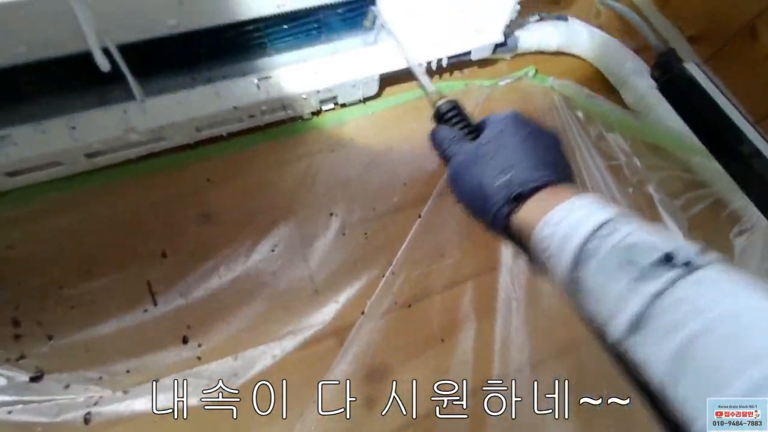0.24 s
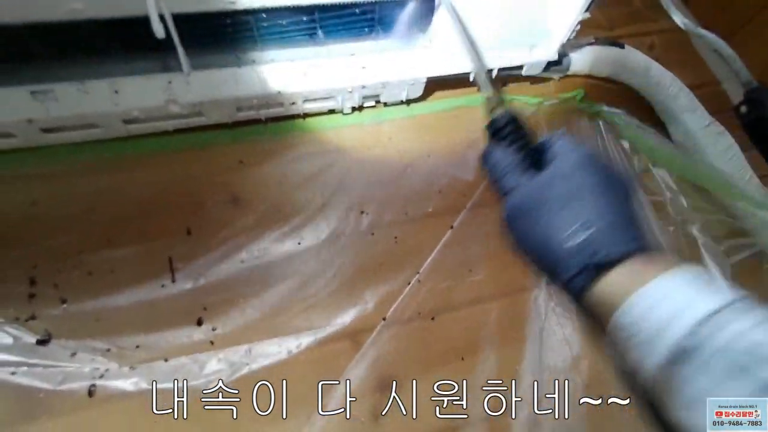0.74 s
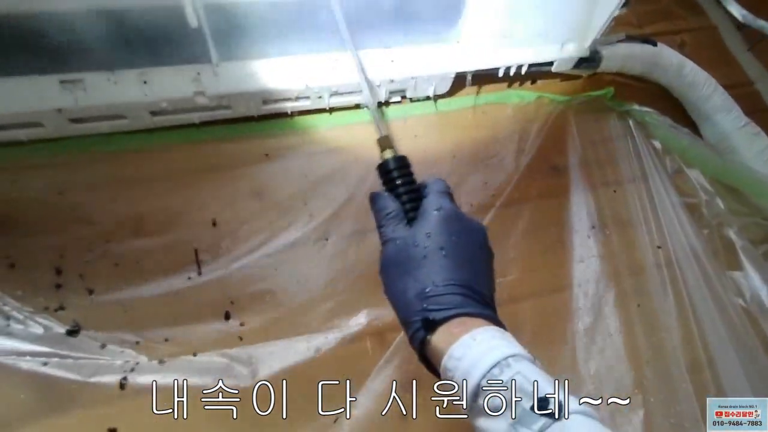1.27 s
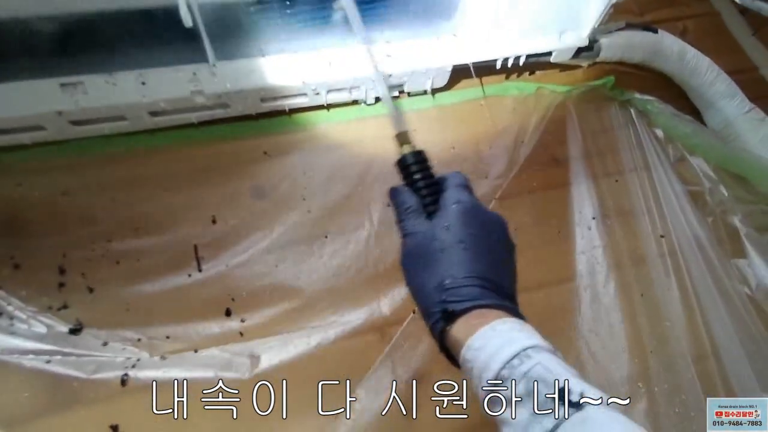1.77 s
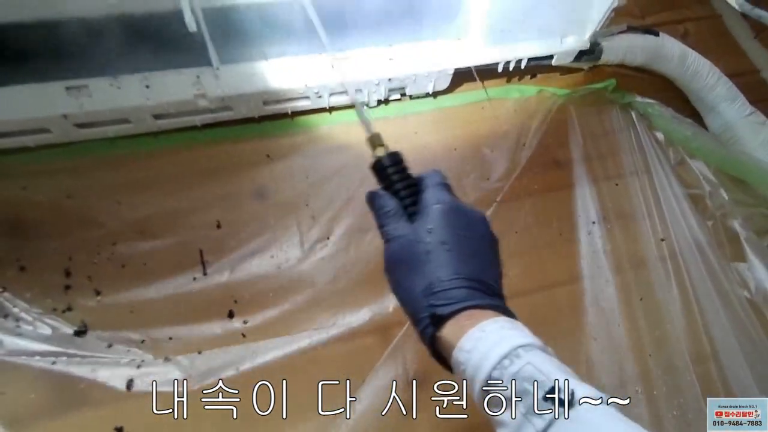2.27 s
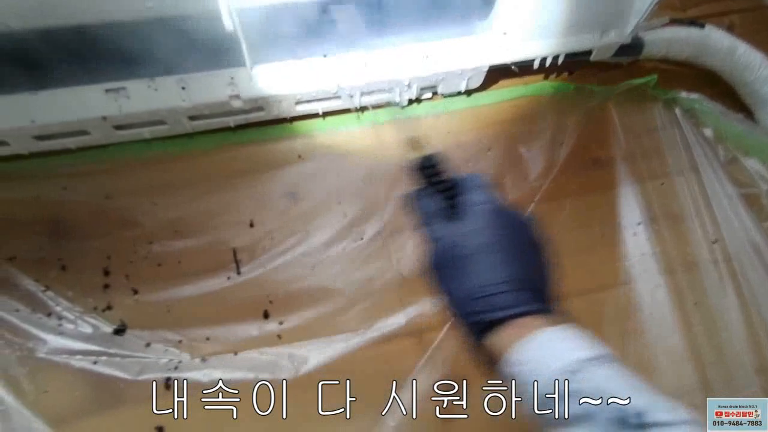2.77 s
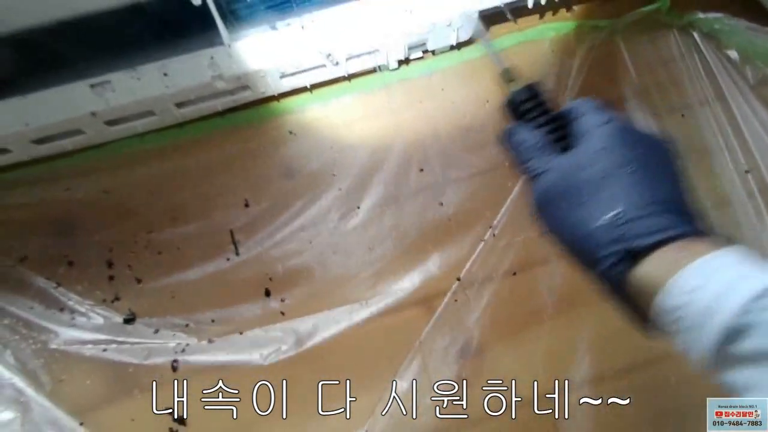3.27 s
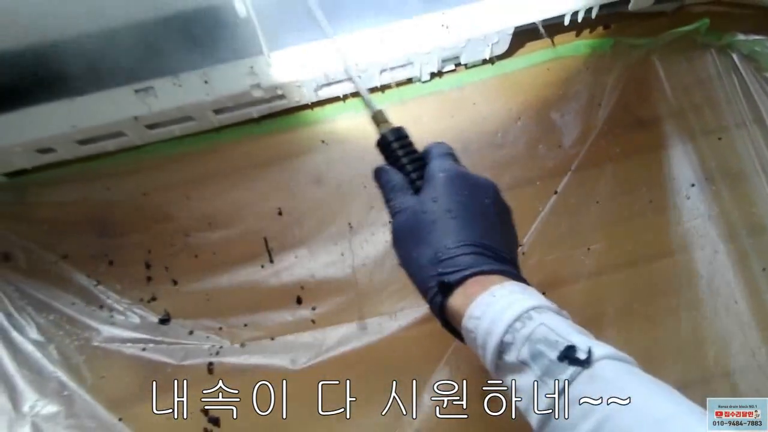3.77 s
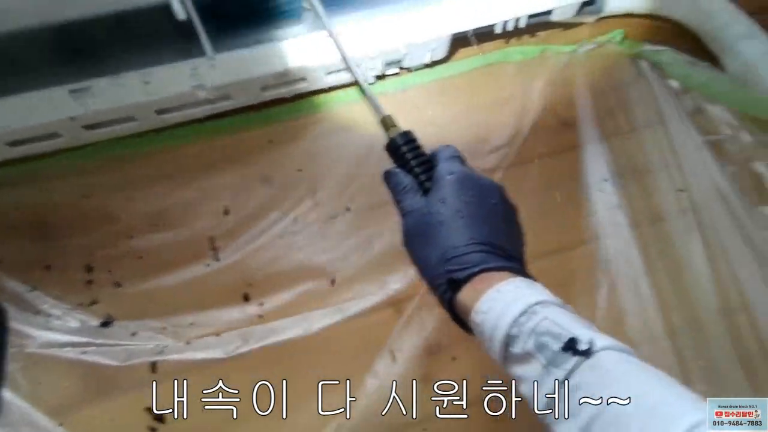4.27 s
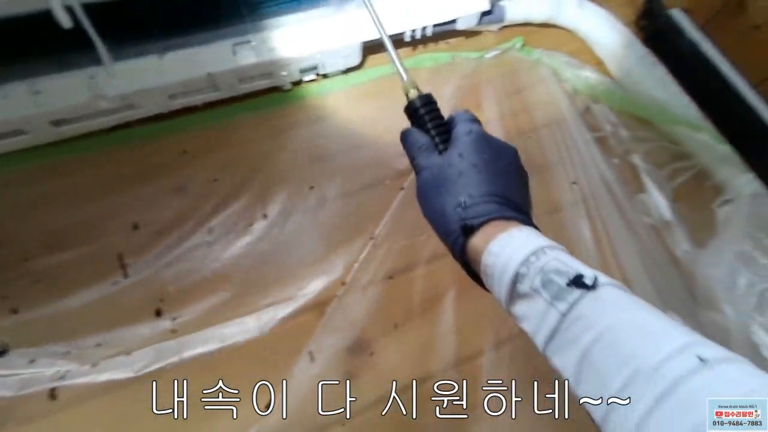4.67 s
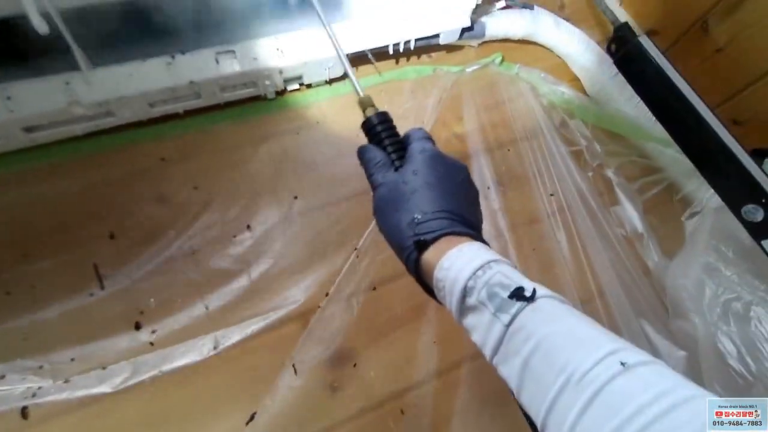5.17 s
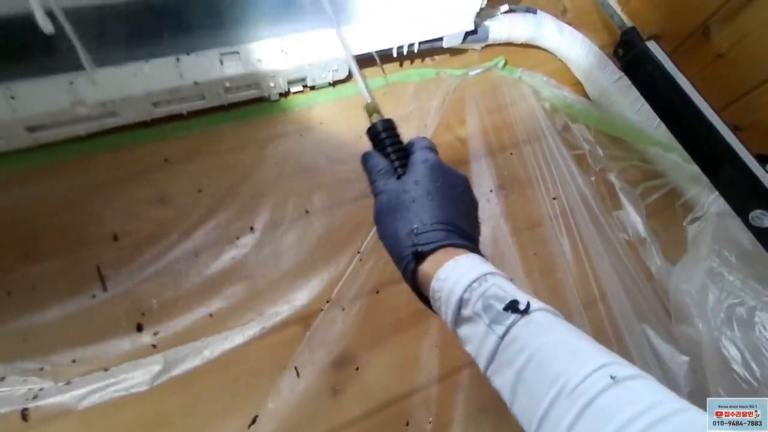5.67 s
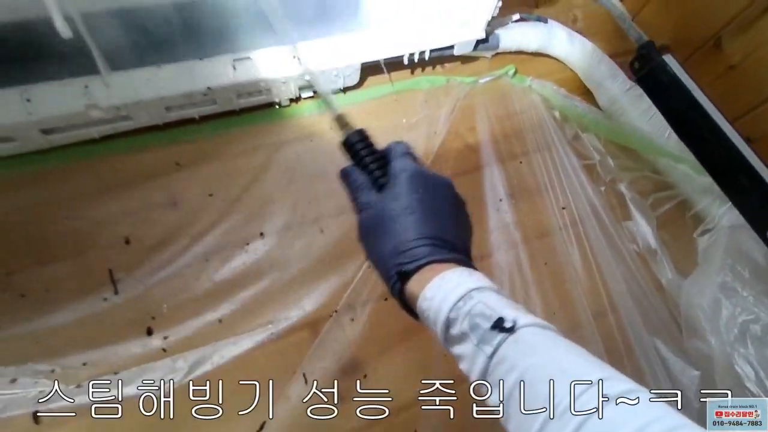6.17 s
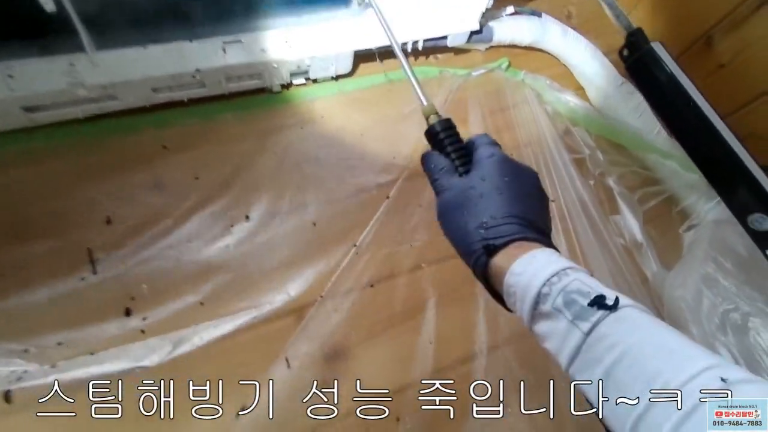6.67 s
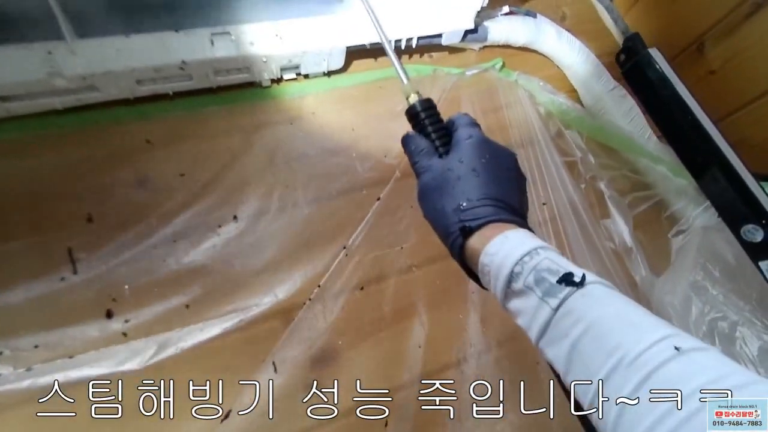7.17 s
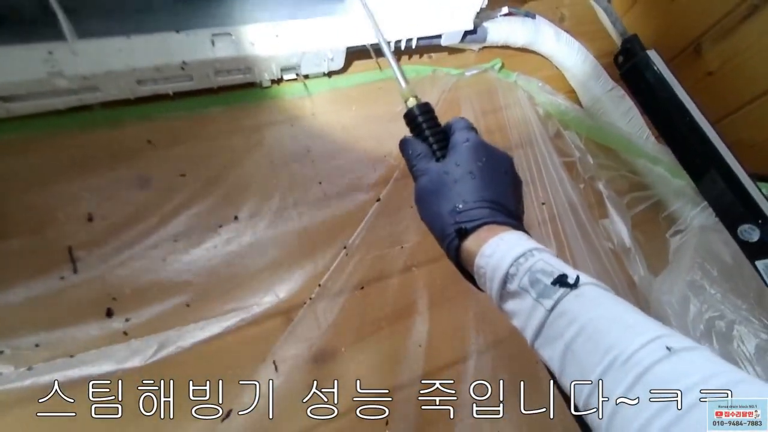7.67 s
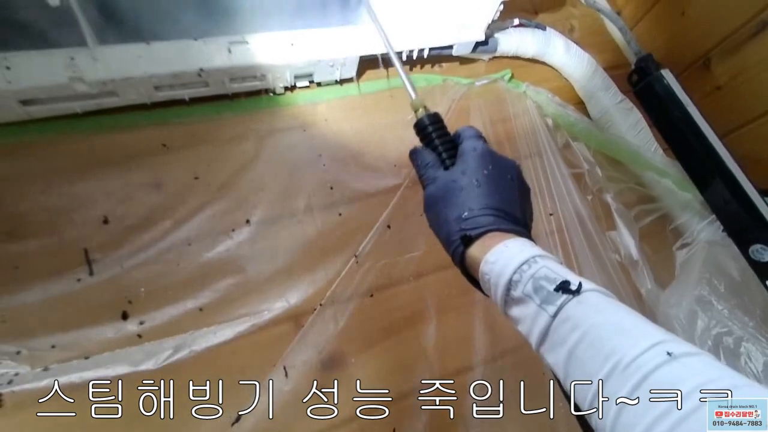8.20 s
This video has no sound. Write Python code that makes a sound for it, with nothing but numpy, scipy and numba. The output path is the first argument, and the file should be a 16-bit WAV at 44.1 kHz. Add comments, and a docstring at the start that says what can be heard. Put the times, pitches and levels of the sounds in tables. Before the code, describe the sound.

Continuous pressurised steam hisses at close range, dominated by treble and flickering quickly. Its tone shifts subtly as the nozzle moves, with short metallic, comb-like reflections from nearby surfaces. Water spatters faintly, while dry clicks and tiny bursts of noise crackle over it, sparse at first and then frequent. A low machine hum and rumble are barely audible. Small room, close, slightly clipping microphone.

```python
"""Steam lance on the fins of an air conditioner

A steam lance is swept over the fins of a wall air conditioner in a small room. The nozzle hisses and the jet
roars on the fins: flickering bands of coloured noise with short echoes from nearby faces and walls. The hollow
housing roars as resonant noise, condensed water spatters as fluctuating noise, short bursts and clicks sound as
of an overloaded microphone, and the machine hums as sines on the mains above a low noise rumble."""
import sys
import numpy as np
from scipy import signal
from scipy.fft import rfft, irfft
from scipy.io import wavfile
from scipy.ndimage import uniform_filter1d, map_coordinates
from numba import njit

SR = 44100
rng = np.random.default_rng(int(sys.argv[2]) if len(sys.argv) > 2 else 0)


def unload_wav(signal):
    """Save mono or channel-first audio to the path in sys.argv[1] as 16-bit WAV at rate SR, clipped to [-1, 1]."""
    wavfile.write(
        sys.argv[1],
        SR,
        np.round(np.clip(np.atleast_2d(signal).T, -1, 1) * 32767).astype(np.int16),
    )


N = 372204

# Hum of the machine. Each row: multiple of the mains frequency, rms level in dB before wavering.
HUM = [(1, -60.5), (2, -52), (3, -44), (6, -59)]
MAINS_HZ = 59.97
# Colour of the low rumble. Each row: frequency in Hz, relative level per Hz in dB.
RUMBLE = [(20, -18), (60, -17), (140, 0.5), (200, 2), (260, -39), (600, -34)]
RUMBLE_DB = -48  # rms

# Colour of spatter and bursts. Each row: frequency in Hz, relative level per Hz in dB.
SPATTER = [(25, -3), (150, -3.5), (250, -7.5), (330, 0), (450, 2.5), (750, 2), (950, 1.5), (1150, 0),
           (1400, -4.5), (2000, -4), (4500, -5), (8000, -4.5), (12000, -19.5)]
# Left-right correlation of spatter, bursts and rumble. Each row: frequency in Hz, correlation (0-1).
SPATTER_LIKENESS = [(60, 0.77), (200, 0.65), (640, 0.3), (2000, 0.67), (8000, 0.18)]
# Short broadband noise bursts, as of an overloaded microphone.
# Each row: start in seconds, level of the high part in dB, level of the low part in dB.
BURSTS = [(.489, -34, -43), (.552, -21, -24), (0.629, -11, -16), (.656, -22, -32), (1.277, -17, -25),
          (2.918, -24, -27), (2.925, -16.5, -25), (2.933, -18, -27), (2.98, -30, -22), (2.999, -22, -30),
          (3.014, -14.5, -32), (3.052, -18, -31), (3.075, -29, -31), (3.125, -14, -35), (3.1627, -16, -26),
          (3.206, -18, -36), (3.216, -16, -34), (3.237, -17, -21), (3.34, -20, -24), (3.357, -13, -32),
          (3.382, -18, -22), (3.388, -15.5, -24), (3.52, -19, -42), (3.789, -25, -19), (3.809, -13.5, -20),
          (3.838, -16, -34), (4.253, -18, -28), (4.435, -23, -35), (4.548, -16, -31), (4.573, -13.5, -27),
          (4.687, -21, -33), (5.001, -15, -24), (5.008, -18, -28), (5.019, -23, -28), (5.105, -18, -24),
          (5.266, -20, -33), (5.273, -20, -28), (5.287, -19, -27), (5.297, -11.5, -30), (5.303, -21, -30),
          (5.619, -15, -26), (5.625, -13, -29), (5.631, -19, -30), (5.637, -26, -31), (6.181, -14.5, -24),
          (6.27, -12, -35), (6.552, -12, -32), (6.661, -21, -26), (6.668, -14, -15), (6.675, -19, -25),
          (6.682, -24, -29), (6.855, -15, -30), (6.988, -19, -36), (7.013, -13, -31), (7.0185, -15, -32),
          (7.029, -17, -28), (7.302, -28, -18), (7.316, -24, -30), (7.325, -15, -26), (7.331, -21, -31),
          (7.446, -13, -25), (7.496, -12, -29), (7.638, -16, -26), (7.652, -13, -30), (7.658, -17, -23),
          (7.681, -15, -28), (7.687, -16, -29), (7.693, -22, -27), (7.737, -27, -24), (7.746, -27, -27),
          (7.757, -20, -28), (7.792, -17, -25), (7.924, -19, -26), (7.935, -19, -21), (7.976, -32, -38),
          (8.197, -18, -21), (8.293, -19, -22), (8.402, -17, -24)]
BURST_S, BURST_PAN_DB = 0.0087, 2.5  # length; spread of the left-right level difference
BURST_SPLIT_HZ = 1140  # between low and high part
SPATTER_SWELL_DB = 5  # rise of the spatter at full burst activity
BEFORE_S, AFTER_S = 0.033, 0.09  # the activity rises just ahead of a burst and falls after it

# The loudest sharp clicks, as of overload. Each row: time in seconds, click size in dB before panning.
LOUD_CLICKS = [(0.398, -12), (0.492, -7), (0.629, -6), (1.137, -9), (2.584, -5), (3.016, -6), (3.207, -7),
               (3.358, -6), (3.383, -5), (3.809, -6), (4.536, -7), (4.573, -5), (6.668, -8), (7.182, -7),
               (7.444, 0), (7.498, -6), (7.531, -6), (7.684, -6), (8.403, -7)]
CLICKS_PER_S, ACTIVE_CLICKS_PER_S = 20, 120  # other clicks; how many more at full burst activity
CLICK_DB, CLICK_SPREAD_DB = -17, 2.5  # smallest of the other clicks; scale of their chance excess
CLICK_HZ, CLICK_LIKENESS = (500, 6500), 0.7  # band of the click; 1 would make both sides equal

# The sweep. Each row: time in seconds, then base levels in dB of the nozzle hiss, the roar on the fins,
# the housing roar and the spatter.
SWEEP = [(0, -12.5, -22, -33.5, -37.5), (.2, -12.5, -23.5, -30, -32), (.45, -13, -20, -25, -32),
         (.52, -12.5, -22, -29, -38), (.6, -11.5, -21.5, -31.5, -30.5), (.72, -10.5, -22.5, -29, -41),
         (.8, -8.5, -20.5, -29, -35), (.95, -9.5, -21, -29, -28), (1.3, -9.5, -23, -31, -43),
         (1.55, -11, -24, -28.5, -35), (1.78, -10.5, -23, -29.5, -34), (1.84, -10.5, -22.5, -28.5, -27.5),
         (1.92, -10, -21.5, -27, -28), (2.05, -11, -23.5, -32, -37), (2.2, -10.5, -21.5, -28.5, -35.5),
         (2.4, -12.5, -22.5, -30, -37), (2.58, -9, -22.5, -28, -41), (2.75, -12.5, -24.5, -29, -33),
         (2.86, -12, -21.5, -29, -47), (2.93, -10, -25.5, -34, -34), (3.1, -12, -21.5, -26.5, -37),
         (3.4, -11, -22.5, -31, -35.5), (3.55, -11, -21.5, -30.5, -38.5), (3.95, -9, -24.5, -28.5, -38.5),
         (4.2, -12, -20.5, -31, -38), (4.31, -11, -20.5, -35, -37), (4.4, -11, -23, -36, -35),
         (4.55, -11, -23.5, -30, -43), (4.68, -13, -23, -32, -36), (4.78, -11.5, -21, -30, -32.5),
         (5.1, -11, -20, -31.5, -36), (5.3, -11, -21.5, -30, -41.5), (5.7, -11, -21.5, -30, -35.5),
         (6.1, -11.5, -20, -31, -34), (6.3, -10, -21.5, -34.5, -36.5), (6.55, -12.5, -18.5, -31, -35),
         (6.64, -10, -23, -29, -38), (6.75, -11.5, -21, -29.5, -35.5), (6.93, -11, -20.5, -29.5, -31),
         (7.03, -10.5, -20, -28, -33.5), (7.4, -10.5, -20, -29.5, -36), (7.85, -9, -20.5, -28, -32.5),
         (8.1, -9, -24, -27, -35), (8.27, -8.5, -20.5, -26.5, -31), (8.44, -13, -26, -29, -30)]

# Pitch of the hollow behind the fins, set by where the jet enters. Each row: time in seconds, mean pitch in Hz.
HOLLOW_HZ = [(0, 1500), (.25, 1550), (.45, 1900), (.7, 1510), (1.4, 1450), (2.6, 1580), (3.1, 1510),
             (3.6, 1560), (3.95, 1800), (4.2, 1600), (4.6, 1660), (5.0, 1870), (5.8, 1870), (6.4, 1740),
             (6.8, 1900), (7.2, 1960), (8.44, 1840)]
HOUSING_WIDTH_HZ = 850  # bandwidth of each of two passes
HOUSING_WANDER_HZ, HOUSING_FLOOR_HZ = 91, 1130  # chance spread of the pitch; high-pass corner

# Colours of the roar on the fins and of the hiss. Each row: frequency in Hz, relative level per Hz in dB.
FINS = [(900, -21), (1200, -7.5), (1400, 2), (2000, -14), (2500, 4), (3000, -1.5), (3600, 0.5), (5000, 0),
        (7000, 0), (9000, -1), (12000, -18.5)]
NOZZLE = [(4000, -15), (7000, -7), (9000, -2.5), (10500, 2), (12500, 1.5), (14000, 3.2), (14800, 4.6),
          (15600, 4.6), (16500, 4.6)]
# Left-right correlation of hiss and fin roar. Each row: frequency in Hz, correlation (0-1).
JET_LIKENESS = [(1000, 0.61), (3000, 1), (6000, 1), (10000, 0.78), (15000, 0.79)]
# Phase turn of the left channel: the ports differ in the treble. Each row: frequency in Hz, phase in radians.
LEFT_PHASE = [(5000, -.03), (7500, -0.1), (10000, -0.36), (12000, -.54), (15500, -0.83)]

# Echoes of the fin roar from the nearby face, the open slot (turned upside down), the edge just beside the
# jet, and deep in the housing. Each row: time in seconds, mean delay in ms, strength (0-1).
FACE_ECHO = [(0, .585, .4), (.3, .585, .4), (.55, .66, .25), (.75, .7, .05), (1.1, .65, .1), (1.5, .65, .2),
             (2.7, .64, .2), (3.1, .62, .05), (3.6, .63, .12), (3.9, .6, .1), (4.1, .58, .4),
             (4.4, .575, .4), (4.6, .56, .17), (4.9, .545, .2), (5.4, .55, .38), (6.5, .55, .4),
             (6.8, .56, .08), (7.15, .545, .4), (7.5, .54, .2), (7.8, .54, .3), (8.44, .535, .17)]
SLOT_ECHO = [(0, .68, .45), (.3, .685, .42), (.6, .75, .25), (.8, .78, .05), (1.1, .735, .2),
             (1.5, .735, .38), (2.2, .725, .42), (2.75, .73, .3), (3.0, .72, 0), (3.4, .73, 0),
             (3.65, .72, .25), (3.9, .7, .1), (4.15, .675, .3), (4.45, .665, .2), (4.8, .65, 0),
             (8.44, .65, 0)]
EDGE_ECHO = [(0, .25, 0), (.7, .25, .05), (1.0, .27, .22), (1.5, .295, .25), (2.3, .265, .22),
             (3.0, .26, .12), (3.4, .25, .08), (4.0, .25, 0), (8.44, .25, 0)]
DEEP_ECHO = [(0, 1.3, .25), (.22, 1.3, .28), (.27, 1.4, .05), (.32, 1.5, .24), (.5, 1.51, .2),
             (.6, 1.51, 0), (8.44, 1.51, 0)]
# Echoes of the hiss from the nearby face and a close edge.
# Each row: time in seconds, mean delay in ms, strength (0-1).
NOZZLE_FACE_ECHO = [(0, .6, .12), (.5, .7, .08), (1.5, .69, .12), (2.2, .68, .07), (2.6, .675, .18),
                    (2.9, .66, .04), (3.7, .64, .04), (4.0, .635, .1), (4.4, .6, .17), (4.7, .565, .08),
                    (5.1, .555, .18), (5.8, .55, .24), (6.1, .55, .17), (6.7, .565, .22), (7.0, .56, .15),
                    (7.2, .555, .27), (7.7, .553, .16), (8.44, .55, .19)]
NOZZLE_EDGE_ECHO = [(0, .28, .08), (.8, .28, .1), (1.1, .27, .03), (3.5, .275, .03), (3.75, .272, .17),
                    (4.45, .28, .15), (4.7, .29, .04), (8.44, .29, 0)]
TREMOR_MS = 0.012  # the hand is never still: spread of each echo's delay
# Paths inside the housing: delay range, spread of each path's gain, low-pass corner.
INNER_ECHO_MS, INNER_ECHO_STRENGTH, INNER_ECHO_CUT_HZ = (0.9, 5.0), 0.15, 12700
ROOM_ECHO_MS, ROOM_ECHO_STRENGTH = (6.0, 30.0), 0.15  # walls and sheeting nearby: delays, spread of gain

# Gain of the jet in its upper middle, which sinks as the lance swings aside.
# Each row: time in seconds, gain in dB.
SHADE = [(0, -1.5), (.15, -4), (.27, -4), (.35, -5), (.45, -6.5), (.58, -2), (.75, -3.5), (1.1, -2),
         (1.3, 1), (2.6, 0.5), (2.8, 0), (3.1, -1), (4.3, 0), (4.37, -3), (4.52, -4.5), (4.58, -2),
         (4.66, -1.5), (4.75, -0.5), (5.1, 0), (6.3, 0.2), (6.55, -1.5), (6.8, -4.5), (6.95, -3), (7.1, 0),
         (8.44, 1)]
SHADE_HZ = (3380, 8400)
DIP_HZ, DIP_DEPTH = (925, 1030), 0.6  # a narrow dip under the hiss; share taken out away from the bursts

# Width of the image between the bursts. Each row: time in seconds, share of opening (0-1).
WIDTH = [(0, 0.5), (.4, 0.5), (.7, 0.95), (1.3, 0.57), (1.45, 0.36), (2.75, 0), (2.9, 0.45), (3.45, .6),
         (3.55, 0), (3.7, 0.45), (4.0, 0.54), (4.6, 0.46), (5.35, 0.1), (5.45, 0), (5.6, 1), (6.0, 0.73),
         (6.45, 0.04), (6.6, 0.3), (7.15, 0.7), (7.4, 0.4), (8.44, 0.46)]
# Reach of the narrowing. Each row: frequency in Hz, share of the side sound that follows the width (0-1).
NARROWING = [(1100, 0.025), (1700, 1), (8000, 1), (10500, 0.08)]
WIDTH_EDGES_HZ = (0, 2500, 4000, 6000, 22050)  # bands that widen on their own
NARROW_DB, WIDE_DB, WIDTH_WANDER = -19, 2, 0.14  # side gain when closed and open; chance spread of opening

CUTOFF_HZ = 15760


def from_db(db):
    """Amplitude ratio: twenty decibels are a factor of ten."""
    return 10 ** (np.asarray(db) / 20)


def rms_one(x):
    """Normalisation of power: the root mean square becomes 1."""
    return x / np.sqrt(np.mean(x ** 2) + 1e-20)


def in_time(rows):
    """Linear interpolation of each column at every sample."""
    s, *columns = np.transpose(rows)
    return [np.interp(np.arange(N) / SR, s, c) for c in columns]


def at_hz(points, hz):
    """Interpolation along a logarithmic frequency axis."""
    known_hz, values = np.transpose(points)
    return np.interp(np.log(hz), np.log(known_hz), values)


def frequencies():
    """Frequencies of the Fourier bins in Hz, at least 1 so that a logarithm exists."""
    return np.maximum(np.arange(N // 2 + 1) * SR / N, 1)


def drift(rate_hz):
    """Slow random modulation: noise at every 40th sample through a double one-pole low-pass; spread 1."""
    r = np.exp(-80 * np.pi * rate_hz / SR)
    noise = rng.standard_normal(N // 40 + 2002)
    slow = signal.lfilter([1], [1, -2 * r, r * r], noise)[2000:]  # the filter has settled
    return np.interp(np.arange(N) / 40, np.arange(len(slow)), rms_one(slow))


def band_pass(x, band_hz):
    """Zero-phase filtering: a band is isolated without delay."""
    return signal.sosfiltfilt(signal.butter(2, band_hz, "band", fs=SR, output="sos"), x)


def turbulence(spectrum, likeness, flicker_db, count):
    """Turbulent noise: coloured and partly correlated in stereo, in bands that flicker separately; rms 1."""
    hz = frequencies()
    alike = np.clip(at_hz(likeness, hz), 0, 1)
    mid, side = rfft(rng.standard_normal((2, N))) * from_db(at_hz(spectrum, hz))
    pair = np.sqrt(1 + alike) * mid + np.sqrt(1 - alike) * side * [[1], [-1]]
    pair[0] *= np.exp(1j * at_hz(LEFT_PHASE, hz))
    low_hz, high_hz = spectrum[0][0], spectrum[-1][0]
    place = count * np.clip(np.log(hz / low_hz) / np.log(high_hz / low_hz), 0, 1)
    out = 0
    for k in range(count + 1):  # overlapping bands whose shares add up to one
        share = np.clip(1 - np.abs(place - k), 0, 1)
        out = out + from_db(flicker_db * drift(13.0)) * irfft(pair * share, N)
    return rms_one(out)


def path_lags(range_ms, count):
    """Multipath delays in samples: geometrically spaced and slightly scattered."""
    ms = np.geomspace(*range_ms, count) * rng.uniform(0.95, 1.05, count)
    return (ms * SR / 1000).astype(int)


def room(x, count=10):
    """Interference of reflections: nearby walls colour the noise finely as the paths slowly change."""
    out = x
    for lag in path_lags(ROOM_ECHO_MS, count):
        out = out + ROOM_ECHO_STRENGTH * drift(1.43) * np.roll(x, lag, axis=1)
    return out / np.sqrt(1 + count * ROOM_ECHO_STRENGTH ** 2)


def hum():
    """Harmonic excitation: pump and transformer sound on multiples of the mains, wavering a little."""
    turn = 2 * np.pi * MAINS_HZ * np.arange(N) / SR
    out = 0
    for multiple, db in HUM:
        amplitude = np.sqrt(2) * from_db(db + 2.2 * drift(6))
        out = out + amplitude * np.sin(multiple * turn + rng.uniform(0, 6))
    return out


def rumble():
    """Low-frequency noise: a steady flickering band under the other sounds."""
    return from_db(RUMBLE_DB) * turbulence(RUMBLE, SPATTER_LIKENESS, flicker_db=2.0, count=3)


def burst_activity():
    """Temporal density: a control (0-1) that rises and falls smoothly around every noise burst."""
    s = np.arange(0, N, 64) / SR
    near = 0
    for at, _, _ in BURSTS:
        near = near + np.exp(-((s - at) / np.where(s < at, BEFORE_S, AFTER_S)) ** 2)
    return np.interp(np.arange(N) / SR, s, np.tanh(near))


def spatter_and_bursts(spatter_db):
    """Amplitude-modulated noise: a fluctuating spatter, and short bursts as of an overloaded microphone."""
    small = from_db(1.9 * drift(145) + 1.0 * drift(22))
    low_level = from_db(spatter_db) * rms_one(small) * np.ones((2, 1))
    high_level = low_level.copy()
    size = max(int(BURST_S * SR), 20)
    for s, high_db, low_db in BURSTS:
        start = int(s * SR)
        pan = from_db(BURST_PAN_DB * rng.standard_normal() * np.array([[0.5], [-0.5]]))
        burst = pan * np.sqrt(np.hanning(size))[:N - start]
        high_level[:, start:start + size] += burst * from_db(high_db)
        low_level[:, start:start + size] += burst * from_db(low_db)
    noise = room(turbulence(SPATTER, SPATTER_LIKENESS, flicker_db=2.5, count=9))
    low = signal.filtfilt(*signal.butter(2, BURST_SPLIT_HZ, fs=SR), noise)
    return low_level * low + high_level * (noise - low)


def clicks(activity):
    """Impulse response: sharp band-limited clicks at chance times, mostly negative-going, as of overload."""
    born = rng.random(N) < (CLICKS_PER_S + ACTIVE_CLICKS_PER_S * activity) / SR
    sizes = born * from_db(CLICK_DB + CLICK_SPREAD_DB * np.minimum(rng.exponential(1, N), 3))
    s, db = np.transpose(LOUD_CLICKS)
    sizes[(s * SR).astype(int)] = from_db(db)
    sign = np.where(rng.random(N) < 0.75, -1, 1)
    side = (1 - CLICK_LIKENESS) * rng.standard_normal(N) * np.array([[1.], [-1.]])
    impulse = np.arange(64) == 0
    click = signal.lfilter(*signal.butter(1, CLICK_HZ, "band", fs=SR), impulse)
    return signal.lfilter(click / click.max(), [1], sign * sizes * (1 + side))


@njit
def moving_resonance(x, cosine, r):
    """Time-varying resonance: a two-pole band-pass whose centre changes sample by sample."""
    y = np.zeros_like(x)
    for i in range(2, x.shape[1]):
        for c in range(2):
            y[c, i] = x[c, i] - x[c, i - 2] + 2 * r * cosine[i] * y[c, i - 1] - r * r * y[c, i - 2]
    return y


def housing(hz):
    """Cavity resonance: noise in the hollow behind the fins takes a pitch set by where the jet enters."""
    x = rng.standard_normal(N) + 0.11 * rng.standard_normal(N) * np.array([[1.], [-1.]])
    cosine = np.cos(2 * np.pi * hz / SR)
    r = np.exp(-np.pi * HOUSING_WIDTH_HZ / SR)
    for _ in range(2):
        x = moving_resonance(x, cosine, r)
    x = signal.sosfilt(signal.butter(4, HOUSING_FLOOR_HZ, "high", fs=SR, output="sos"), x)
    half_second_power = uniform_filter1d(x[0] ** 2, size=22050)
    return rms_one(x / np.sqrt(half_second_power))


def hollow_roar(housing_db, surge_db):
    """Flow-excited cavity: the housing roars with a wandering pitch and a level that follows the surges."""
    hz = in_time(HOLLOW_HZ)[0] + HOUSING_WANDER_HZ * drift(3.7)
    return from_db(housing_db + 1.75 * surge_db + 0.95 * drift(13)) * housing(hz)


def face_echo(x, *echoes):
    """Comb filtering: short reflections, each (delay in ms, strength), shift as the lance moves."""
    out, power = x, 1
    for delay_ms, strength in echoes:
        late = np.arange(N) - (delay_ms + TREMOR_MS * drift(4)) * SR / 1000
        reflection = np.array([map_coordinates(c, [late], order=3, mode="nearest") for c in x])
        out = out + strength * reflection
        power = power + strength ** 2
    return out / np.sqrt(power)


def fin_roar(fins_db, surge_db):
    """Impingement noise: the jet roars on the fins, with reflections from face, slot, edge and depth."""
    noise = room(turbulence(FINS, JET_LIKENESS, flicker_db=1.52, count=7))
    slot_ms, slot_strength = in_time(SLOT_ECHO)
    slot = (slot_ms, -slot_strength)  # the open slot turns the echo upside down
    roar = from_db(fins_db + 0.18 * surge_db) * noise
    return face_echo(roar, in_time(FACE_ECHO), slot, in_time(EDGE_ECHO), in_time(DEEP_ECHO))


def nozzle_hiss(nozzle_db, surge_db):
    """Jet noise: the nozzle hisses in the treble, with reflections from a face and an edge."""
    noise = turbulence(NOZZLE, JET_LIKENESS, flicker_db=1.5, count=11)
    hiss = from_db(nozzle_db + 1.17 * surge_db) * noise
    return face_echo(hiss, in_time(NOZZLE_FACE_ECHO), in_time(NOZZLE_EDGE_ECHO))


def echoed(x, count=12):
    """Multipath propagation: paths inside the housing come and go as the lance moves."""
    out, power = x, 1
    dull = signal.lfilter(*signal.butter(1, INNER_ECHO_CUT_HZ, fs=SR), x)
    for lag in path_lags(INNER_ECHO_MS, count):
        gain = INNER_ECHO_STRENGTH * drift(4.4)
        out = out + gain * np.roll(dull, lag, axis=1)
        power = power + gain ** 2 / 2
    return out / np.sqrt(power)


def shaded(x):
    """Directivity: the upper middle of the jet follows its own level as the lance swings aside."""
    return x + (from_db(in_time(SHADE)[0]) - 1) * band_pass(x, SHADE_HZ)


def dipped(x, activity):
    """Band rejection: a narrow band sinks away from the bursts."""
    return x - DIP_DEPTH * (1 - activity) * band_pass(x, DIP_HZ)


def narrowed(x, activity):
    """Mid-side balance: the stereo image of the middle range narrows and widens over time, band by band."""
    mid, side = (x[0] + x[1]) / 2, (x[0] - x[1]) / 2
    hz = frequencies()
    middle = rfft(side) * np.clip(at_hz(NARROWING, hz), 0, 1)
    steady = in_time(WIDTH)[0]
    for low, high in zip(WIDTH_EDGES_HZ, WIDTH_EDGES_HZ[1:]):
        opening = np.clip(0.6 * activity + steady + WIDTH_WANDER * drift(4.3), 0, 1)
        gain = from_db(NARROW_DB + (WIDE_DB - NARROW_DB) * opening)
        band = irfft(middle * (hz > low) * (hz <= high), N)
        side = side - band * (1 - gain)
    return np.array([mid + side, mid - side])


def scene():
    """Superposition: jet, housing, spatter and clicks share one stereo image; rumble and hum are added."""
    nozzle_db, fins_db, housing_db, spatter_db = in_time(SWEEP)
    activity = burst_activity()
    surge_db = 1.19 * drift(120)  # the flow surges; each part of the jet follows by its own factor
    direct = nozzle_hiss(nozzle_db, surge_db) + fin_roar(fins_db, surge_db)
    jet = shaded(echoed(direct)) + hollow_roar(housing_db, surge_db)
    short_sounds = clicks(activity) + spatter_and_bursts(spatter_db + SPATTER_SWELL_DB * activity)
    return narrowed(dipped(jet + short_sounds, activity), activity) + rumble() + hum()


def record(dry):
    """Overload and band limiting: a small offset, clipping of the highest peaks and a steep top cut."""
    clipped = np.clip(dry + 0.002, -0.96, 0.96)
    return signal.sosfilt(signal.ellip(14, 0.3, 70, CUTOFF_HZ, fs=SR, output="sos"), clipped)


dry = scene()
out = record(dry)
unload_wav(out)
```